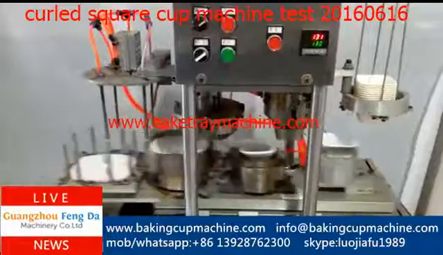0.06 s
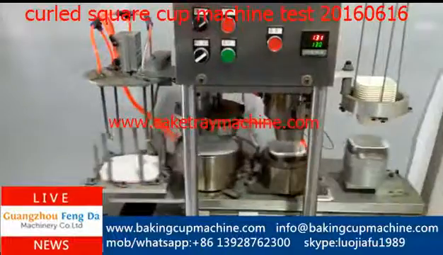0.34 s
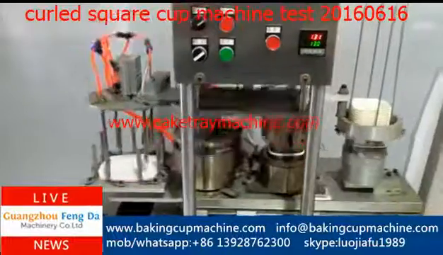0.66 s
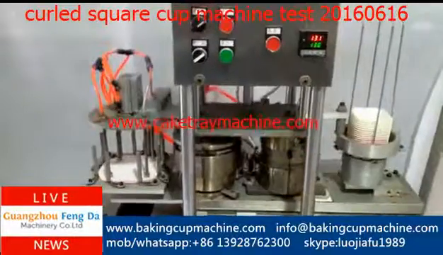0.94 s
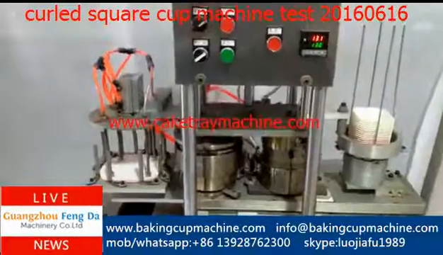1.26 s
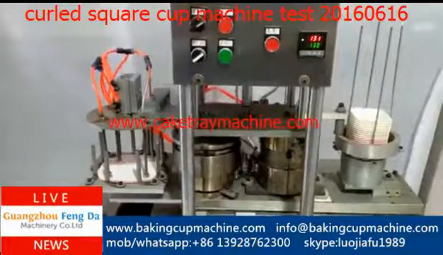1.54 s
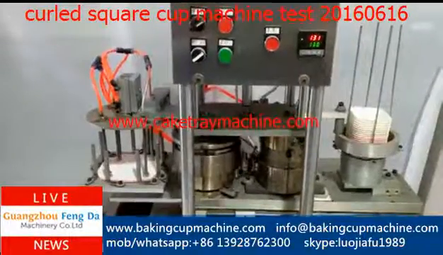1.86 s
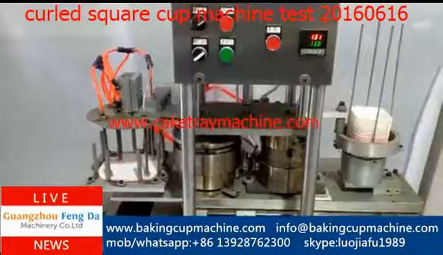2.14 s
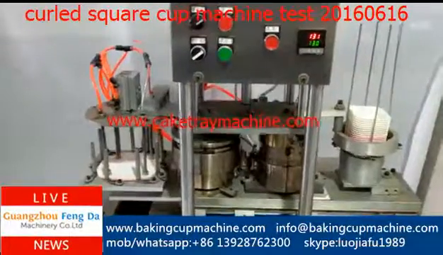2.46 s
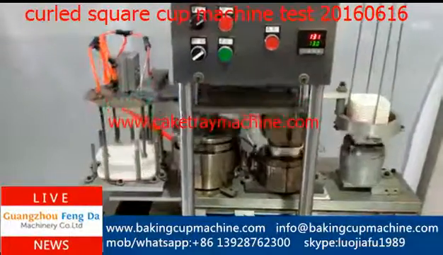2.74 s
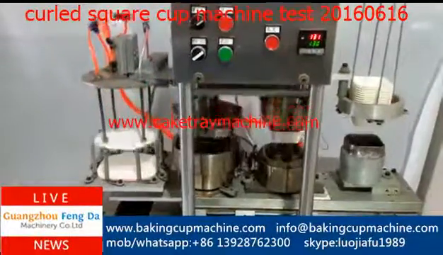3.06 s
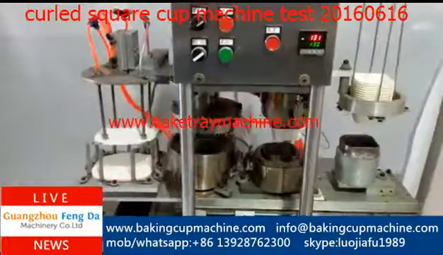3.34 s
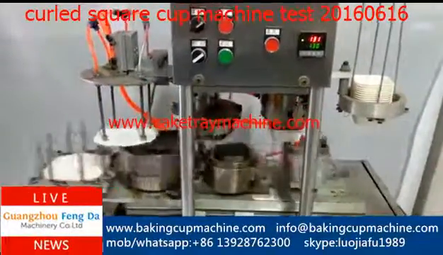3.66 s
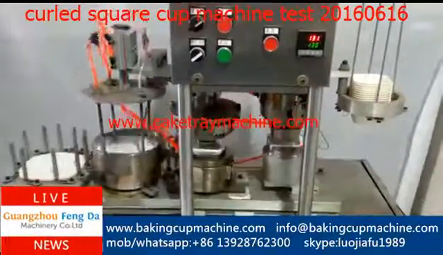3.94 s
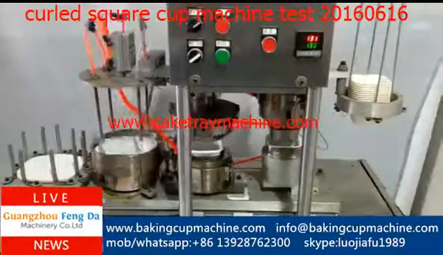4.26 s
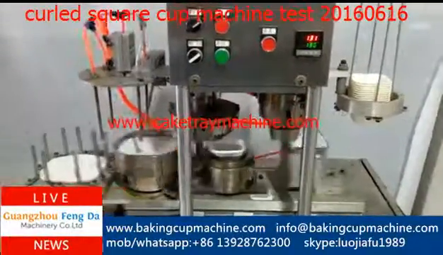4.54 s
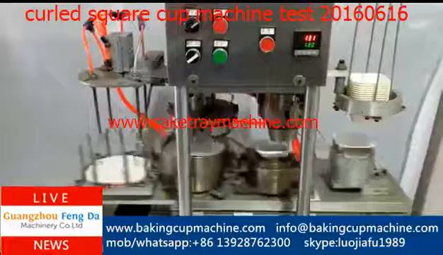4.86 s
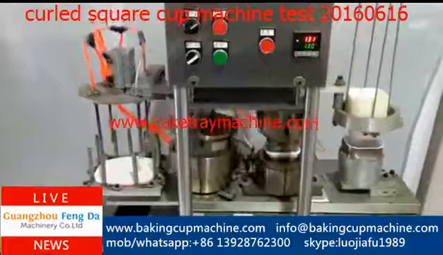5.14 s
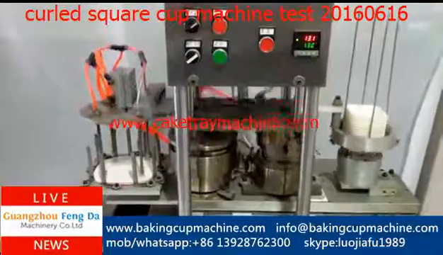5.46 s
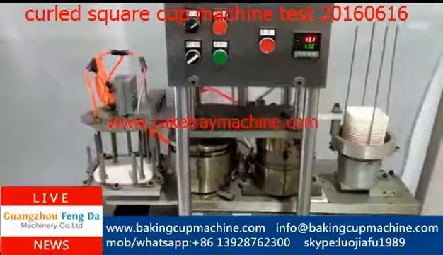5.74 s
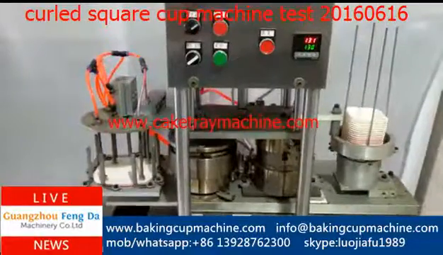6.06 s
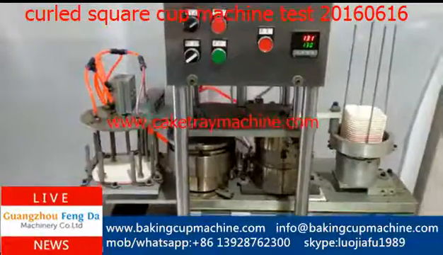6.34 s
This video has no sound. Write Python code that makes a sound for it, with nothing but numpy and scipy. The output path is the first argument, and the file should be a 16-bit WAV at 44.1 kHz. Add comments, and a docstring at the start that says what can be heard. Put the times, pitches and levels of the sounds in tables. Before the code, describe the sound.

Loud hisses of compressed air recur as a forming machine cycles, with thin leaks, metallic clatter and a motor humming between them.

```python
"""The air-driven press of a paper cup machine blows its air out through a silencer in three long blasts.
Between them air leaks, small feeder cylinders puff, the carriage clicks and scrapes, and pistons knock
on the steel frame. The press guides rub, and the frame creaks after each stroke. A motor and a vacuum
pump hum in the noisy workshop. One microphone hears it all; its automatic volume control turns the hum
down under each blast and lets it swell back."""
import sys
import numpy as np
from scipy import signal
from scipy.fft import rfft, irfft, next_fast_len
from scipy.io import wavfile
from scipy.ndimage import uniform_filter1d, minimum_filter1d

SR = 44100
rng = np.random.default_rng(int(sys.argv[2]) if len(sys.argv) > 2 else 0)


def generate_wav(sig):
    """Save sig (samples, or channels by samples) to the path in sys.argv[1] as 16-bit PCM at SR."""
    pcm = np.round(np.clip(np.atleast_2d(sig).T, -1, 1) * 32767).astype(np.int16)
    wavfile.write(sys.argv[1], SR, pcm)


N = 281799

# A "colour" says how strong low and high pitches are in a noise, compared with each other.
# workshop noise: (frequency [Hz], level [dB])
SHOP_COLOUR = [(25, -30), (50, -21), (75, -3), (130, 5.5), (260, 1.5), (400, 1), (550, 0.5), (750, -2),
               (1000, -4), (1450, -4), (2200, -9), (3500, -10.5), (6200, -9), (8000, -17), (14500, -33)]
# its rise and fall: (time [s], level [dB])
SHOP_SWELL = [(0, -32), (0.6, -33), (1.2, -31), (1.7, -33.5), (2.3, -25), (2.6, -32), (3.3, -32.5),
              (3.7, -31), (3.95, -29), (4.3, -28.5), (4.9, -32.5), (5.2, -35.5), (5.8, -31), (6.39, -32)]
# tones of motor and panels, pump, and loaded press: (frequency [Hz], level [dB], unsteadiness [0-1])
MOTOR_TONES = [(50.3, -59.5, 0.8), (99.7, -37, 0.06), (173.3, -50, 0.4), (199.5, -49, 0.3),
               (301, -48.5, 0.55), (318, -47.5, 0.4), (402.7, -47.5, 0.4), (604, -53, 0.7),
               (716, -48.5, 0.4)]
PUMP_TONES = [(150.4, -44, 0.4), (247.8, -38, 0.24), (270.6, -56, 0.6), (393, -50, 0.57), (493.4, -52, 0.5)]
LOAD_TONES = [(150.3, -39.5, 0), (734, -41.5, 0.3), (757, -51, 0.4), (770, -48, 0.4), (793, -47, 0.4)]
# how the motor and pump swell and sink: (time [s], level change [dB])
MOTOR_SWELL = [(0, -0.5), (1.3, -1.5), (2.25, 3.5), (3.2, 0), (4.7, 1), (5.5, -3), (6.39, 1)]
PUMP_SWELL = [(0, 0), (0.6, 1.5), (1.5, 1), (2.3, 7), (3.2, 1), (4.7, 1.5), (5.4, -4.5), (6.39, -6)]
# when the extra loaded tones sound: (start [s], end [s])
LOAD_TIMES = [(1.35, 3), (5.8, 6.39)]
# notes the steel frame rings at: (frequency [Hz], level [dB], time to fade by 60 dB [s])
FRAME_NOTES = [(376, -16, 0.054), (472, -9, 0.06), (623, 0.5, 0.09), (705, -4, 0.054), (810, 0, 0.086),
               (876, -3.5, 0.15), (1114, 0, 0.058), (1354, -3.5, 0.05), (1413, -3, 0.18), (1510, 1.5, 0.09),
               (1653, 2, 0.037), (1740, -3.5, 0.11), (1904, -4.5, 0.066), (2450, -3.5, 0.076)]
# pistons hit their stops and bounce: (time [s], level [dB], frequency that rings most [Hz])
PISTON_KNOCKS = [(0.744, -36, 1400), (2.756, -16, 1010), (2.782, -25, 800), (3.907, -22, 680),
                 (3.931, -21.5, 860), (3.948, -24.5, 450), (3.981, -31, 1400), (4.049, -21, 1140),
                 (4.063, -27.5, 1700), (4.107, -28.5, 1400), (4.337, -30, 1100), (4.353, -28, 720),
                 (5.372, -21, 900)]
# dull thud of a knock: (frequency [Hz], level [dB])
THUD_COLOUR = [(45, -20), (130, 9), (500, 0), (1000, 0), (2000, -2.5), (8000, -11.5)]
# pitches the steel fittings ring at: (frequency [Hz], width [Hz], boost [dB])
FITTING_PEAKS = [(3300, 500, 4), (4020, 670, 8.5), (4570, 500, 8), (5140, 620, 7.5), (6950, 580, 11),
                 (7800, 490, 12)]
# metal taps metal in the carriage and valves: (time [s], ring level [dB], snap level [dB])
METAL_CLICKS = [(3.589, -18.5, -35), (3.6337, -10.5, -21), (3.67, -13.5, -35), (3.7, -17.5, -35),
                (3.74, -29, -42), (3.907, -16, -22), (4.036, -26, -23), (4.172, -21, -22)]
# short strokes of the feeder cylinders: (time [s], level [dB], length [s])
FEEDER_PUFFS = [(3.909, -15, 0.01), (3.98, -25.5, 0.0055), (4.054, -17, 0.047), (4.27, -19, 0.0077),
                (4.354, -22, 0.017)]
# a puff of air: (frequency [Hz], level [dB])
PUFF_COLOUR = [(1000, -18), (2800, -4.5), (4000, 0), (5000, 7), (6300, 8.5), (8000, 2.5), (10000, -2),
               (12500, -6), (14500, -15)]
# air leaks before each press stroke, except while the feeder uses it: (start [s], end [s], level [dB])
LEAK_TIMES = [(-0.1, 0.29, -29.5), (2.06, 2.38, -45.5), (3.003, 3.89, -27.5), (4.16, 4.905, -29.5)]
# hiss of the leak: (frequency [Hz], level [dB])
LEAK_COLOUR = [(1000, -11.5), (2800, -1.5), (4000, 7.5), (5000, 6.5), (6100, 4), (6900, 8), (7800, 1.5),
               (9000, -3.5), (10000, 3), (11000, -10.5), (12300, 0), (13500, -3.5), (14500, -35)]
# its faint whistles: (frequency [Hz], width [Hz], boost [dB])
LEAK_PEAKS = [(4190, 330, 1.5), (5110, 470, 8.5), (5610, 72, 6), (5930, 96, 13.5), (6180, 90, 14),
              (6430, 49, 13), (6640, 80, 7), (6850, 80, 3.5)]
# hollow middle pitches of a blast: (frequency [Hz], width [Hz], level against the roar [dB])
HOLLOW_BANDS = [(329.4, 180, -25.5), (657, 48, -32.5), (1310, 68, -26.5), (1680, 98, -29),
                (1990, 75, -30.5)]
# roar of the air jet, and fine hiss of the silencer's pores: (frequency [Hz], level [dB])
ROAR_COLOUR = [(300, -75), (1000, -54), (2300, -17), (3000, -9), (3900, -4.5), (4700, -2), (6400, -1.5),
               (7200, -4.5), (8000, -6.5), (8800, -10.5), (11000, -13), (14500, -20.5)]
SIZZLE_COLOUR = [(2000, -52), (5000, -14), (8000, -12.5), (11000, -4.5), (14500, -6.5)]
# narrow, steady peaks in the blast's hiss: (frequency [Hz], width [Hz], boost [dB])
HISS_PEAKS = [(3060, 50, 3), (3220, 110, 3), (3470, 170, -4), (3790, 50, 2.5), (3990, 50, 3), (4255, 45, 3),
              (4380, 40, 3), (4500, 48, 5), (4640, 70, 2), (5024, 48, 4.5), (5137, 40, 3), (5260, 50, 3),
              (5510, 40, 2.5), (5617, 26, 5.5), (5682, 26, 6), (5985, 35, 4.5), (6074, 30, 7.5),
              (6130, 40, 4), (6268, 40, 7.5), (6388, 40, 9), (6599, 36, 7), (6655, 50, 3.5), (6820, 35, 3),
              (6903, 24, 5.5), (7030, 35, 3), (7120, 45, 4), (7560, 36, 6.5), (7630, 45, 3),
              (7790, 45, 3.5), (7985, 55, 5.5), (8330, 50, 3), (9900, 80, 4)]
# press strokes, down and up in turn: (time [s], blast level [dB], extra as the valve opens [dB],
# valve puff [dB], guide rub [dB], time until nearly empty [s], bright first spit [dB])
PRESS_STROKES = [(0.372, -4, 2, -12, -54, 1.017, -36), (2.383, -5.5, 6, -28, -21.5, 1.01, -17),
                 (5.005, -4.5, 4.5, -23, -57, 1.02, -36)]


def from_db(db):
    """Turns decibels into a number to multiply by."""
    return 10 ** (np.asarray(db) / 20)


def rms_one(x):
    """Scales a signal to an average strength (rms) of 1."""
    return x / np.sqrt(np.mean(x ** 2) + 1e-20)


def clock():
    """The time of every sample, in seconds."""
    return np.arange(N) / SR


def drift(rate):
    """A random wobble of size about 1, changing about rate times a second."""
    coarse = np.arange(0, N, SR // 1000)
    hz = np.fft.rfftfreq(len(coarse), coarse[1] / SR)
    spectrum = rfft(rng.standard_normal(len(coarse))) / (1 + (hz / rate) ** 2)
    return np.interp(np.arange(N), coarse, rms_one(irfft(spectrum, len(coarse))))


def noise(colour, peaks=()):
    """Noise of strength 1 with the given colour, boosted at each peak."""
    size = next_fast_len(N, True)
    hz = np.fft.rfftfreq(size, 1 / SR) + 1
    colour_hz, level_db = np.transpose(colour)
    shape_db = np.interp(np.log(hz), np.log(colour_hz), level_db)
    for centre, width, boost_db in peaks:
        shape_db += boost_db / (1 + (2 * (hz - centre) / width) ** 2)
    spectrum = rfft(rng.standard_normal(size)) * from_db(shape_db)
    return rms_one(irfft(spectrum, size)[:N])


def burst(start, rise, length, fade):
    """A loudness curve that rises, holds until start + length, then dies away (all in seconds)."""
    age = clock() - start
    return np.clip(age / rise, 0, 1) * np.exp(-np.maximum(age - length, 0) / fade)


def ring(force, hz, ring_s):
    """Each push starts a pure note that fades by 60 dB in ring_s."""
    decay, step = from_db(-60 / (ring_s * SR)), 2 * np.pi * hz / SR
    return signal.lfilter([0, np.sin(step)], [1, -2 * decay * np.cos(step), decay ** 2], force + 1e-18)


def drone(tones, waver_hz=4.4):
    """Long tones, each wavering a little in loudness and pitch."""
    times = np.arange(0, N / SR + 1, .5 / waver_hz)
    out = 0
    for hz, level_db, unsteady in tones:
        phase = 2 * np.pi * (hz * clock() + rng.random())
        swell, sway = (np.interp(clock(), times, row) for row in rng.standard_normal((2, len(times))))
        tone = (1 + unsteady * swell) * np.cos(phase) + unsteady * sway * np.sin(phase)
        out += from_db(level_db) * np.sqrt(2 / (1 + unsteady ** 2)) * tone
    return out


def workshop(flicker_db=1.1):
    """A wash of machine noise that flickers slightly."""
    level_db = np.interp(clock(), *np.transpose(SHOP_SWELL))
    return from_db(level_db + flicker_db * drift(22)) * noise(SHOP_COLOUR)


def hum():
    """Motor and pump hum all the time; more tones join for a while under load."""
    motor = from_db(np.interp(clock(), *np.transpose(MOTOR_SWELL))) * drone(MOTOR_TONES)
    pump = from_db(np.interp(clock(), *np.transpose(PUMP_SWELL))) * drone(PUMP_TONES)
    load = sum(burst(start, 0.35, end - start, 0.34) for start, end in LOAD_TIMES)
    return motor + pump + load * drone(LOAD_TONES)


def room(x, echo_db=-8.0, ring_s=0.085):
    """Adds many quick echoes from the machine and the nearby walls."""
    age = np.arange(SR // 2) / SR
    tail = rng.standard_normal(len(age)) * from_db(-60 * age / ring_s) * (age > .002)
    echoes = signal.fftconvolve(x, tail / np.sqrt(np.sum(tail ** 2)))[:N]
    return (x + from_db(echo_db) * echoes) / np.sqrt(1 + from_db(echo_db) ** 2)


def guides(creak_db=-21, creak_after_s=0.446, flicker_db=8.5):
    """The guides rub as the press moves, then the frame creaks; the middle pitches flicker unevenly."""
    rub = creak = out = 0
    for start, _, _, _, rub_db, _, _ in PRESS_STROKES:
        rub += from_db(rub_db) * burst(start, 0.14, 0.31, 0.031)
        creak += from_db(creak_db) * burst(start + creak_after_s, 0.026, 0.17, 0.031)
    for hz, level_db, ring_s in FRAME_NOTES:
        octaves_below = max(np.log2(1930 / hz), 0)  # low notes are shaken less
        force = rub * from_db(-23 * octaves_below) + creak * from_db(-30 * octaves_below)
        note = rms_one(ring(rng.standard_normal(N), hz, ring_s))
        out += force * from_db(level_db + flicker_db * np.tanh(drift(7.8))) * note
    return out / np.sqrt(len(FRAME_NOTES))


def knocks(uneven_db=3.0, thud_db=-6.0, spread_octaves=0.31, far_db=-9.5):
    """A piston thuds and makes the frame ring; where it lands decides which notes ring most."""
    times, knock_db, centre_hz = np.transpose(PISTON_KNOCKS)
    thuds = sum(from_db(db + thud_db) * burst(start, 0.0011, 0.0027, 0.031)
                for start, db, _ in PISTON_KNOCKS)
    out = thuds * noise(THUD_COLOUR)
    for hz, note_db, ring_s in FRAME_NOTES:
        far = 1 - np.exp(-(np.log2(hz / centre_hz) / spread_octaves) ** 2)  # 0 at the knock's pitch
        hit_db = knock_db + note_db + far_db * far + uneven_db * rng.standard_normal(len(times))
        force = np.zeros(N)
        force[(times * SR).astype(int)] = from_db(hit_db) * rng.choice([-1, 1], len(times))
        out += ring(force, hz, ring_s)
    return out


def carriage(level_db=-24.5, rough_db=2.0):
    """From the first click on, the carriage scrapes along its rail and shakes the steel fittings."""
    start = min(time for time, _, _ in METAL_CLICKS)
    scrape = from_db(level_db + rough_db * drift(90)) * burst(start, 0.043, 0.15, 0.1)
    return scrape * noise([(1000, -0.5), (5000, 1), (14000, -15)], FITTING_PEAKS)


def clicks():
    """Metal meets metal with a bright snap and a brief ring of the fittings."""
    rings = sum(from_db(db) * burst(start, 0.00066, 0.00088, 0.0061) for start, db, _ in METAL_CLICKS)
    snaps = sum(from_db(db) * burst(start, 0.00061, 0.0023, 0.0071) for start, _, db in METAL_CLICKS)
    rings *= noise([(1000, -11), (5000, 23), (14000, -21)], FITTING_PEAKS)
    snaps *= noise([(1000, -33), (6000, 22), (14000, 6)])
    return rings + snaps


def puffs(valve_s=0.0082):
    """Each feeder stroke, and each switch of the press valve, lets out a puff of air."""
    valve_puffs = [(start, puff_db, valve_s) for start, _, _, puff_db, *_ in PRESS_STROKES]
    flow = sum(from_db(db) * burst(start, 0.013, length, 0.031)
               for start, db, length in FEEDER_PUFFS + valve_puffs)
    return flow * noise(PUFF_COLOUR)


def leak(seep_db=-44, flutter_db=0.56):
    """Leaking air makes a thin, whistly hiss that builds, holds and dies back to a faint seep."""
    flow = sum(from_db(db) * burst(start, 0.23, end - start, 0.093) for start, end, db in LEAK_TIMES)
    return (from_db(seep_db) + flow) * from_db(flutter_db * drift(37)) * noise(LEAK_COLOUR, LEAK_PEAKS)


def warble(dip_db=19.0, wander_hz=54.9):
    """The hollow part of a blast: narrow bands of noise each wander in pitch, dip and come back."""
    out = 0
    for hz, width, level_db in HOLLOW_BANDS:
        phase = 2 * np.pi * np.cumsum(hz + wander_hz * drift(7)) / SR
        band = drift(width / 2) * np.cos(phase) + drift(width / 2) * np.sin(phase)
        out += from_db(level_db + dip_db * np.minimum(drift(11), 0)) * band
    return out


def press_blasts(flutter_db=0.66, open_s=0.02, extra_fade_s=0.13, spit_fade_s=0.17):
    """Air roars out, fading ever faster as the cylinder empties; the silencer's pores spit, then hiss."""
    roar = sizzle = 0
    for start, level_db, extra_db, _, _, empty_s, spit_db in PRESS_STROKES:
        age = np.maximum(clock() - start, 0)
        valve = np.minimum(age / open_s, 1)
        pressure_db = level_db + extra_db * np.exp(-age / extra_fade_s)
        roar_drop_db = np.minimum(30 * (age / empty_s) ** 3.06, 100)
        roar += valve * from_db(pressure_db - roar_drop_db)
        # the fine hiss lasts a little longer and depends less on the pressure
        sizzle_drop_db = np.minimum(45 * (age / (1.19 * empty_s)) ** 5.4, 100)
        sizzle += valve * from_db(-17 + 0.36 * pressure_db - sizzle_drop_db)
        sizzle += valve * from_db(spit_db) * np.exp(-age / spit_fade_s)
    flutter = from_db(flutter_db * drift(57))
    jet = noise(ROAR_COLOUR, HISS_PEAKS) + warble()
    return flutter * (roar * jet + sizzle * noise(SIZZLE_COLOUR))


def scene():
    """Mixes everything into two equal channels; only the air sounds and the guides get echoes."""
    echoing = room(press_blasts() + leak() + puffs() + guides())
    machine = echoing + knocks() + clicks() + carriage()
    return np.tile(machine + hum() + workshop(), (2, 1))


def loudness_db(x, seconds):
    """The level, averaged over a short time."""
    return 10 * np.log10(np.maximum(uniform_filter1d(x[0] ** 2, int(seconds * SR)), 1e-10))


def fall_slowly(level_db, db_per_s):
    """Follows a rise at once, but falls no faster than db_per_s."""
    ramp = db_per_s * clock()
    return np.maximum.accumulate(level_db + ramp) - ramp


def volume_control(x, target_db=-10.0, max_boost_db=13.0, hold_s=0.64, ahead_s=0.0032):
    """Turns quiet stretches up, but waits a while after the last loud sound."""
    level_db = loudness_db(x, 0.0093)
    level_db[0] = -17.5  # start with only part of the boost
    size = int(hold_s * SR) | 1
    recent_peak_db = -minimum_filter1d(-level_db, size, origin=size // 2, mode="nearest")
    boost_db = np.clip(target_db - fall_slowly(recent_peak_db, db_per_s=14), 0, max_boost_db)
    boost_db = np.interp(clock() + ahead_s, clock(), boost_db)
    return x * from_db(uniform_filter1d(boost_db, int(.035 * SR)))


def limiter(x, limit_db=-14.0, strength=0.79, react_s=0.0094, ceiling=1.33):
    """Turns loud blasts down, a little late so their first spit gets through, and rounds their peaks."""
    level_db = fall_slowly(loudness_db(x, 0.038), db_per_s=65)
    over_db = np.maximum(level_db - limit_db, 0)
    lag = np.exp(-1 / (react_s * SR))
    cut_db = strength * signal.lfilter([1 - lag], [1, -lag], over_db)
    return ceiling * np.tanh(x * from_db(-cut_db) / ceiling)


def record(dry):
    """Volume control, limiter, then a steep cut of everything above 14750 Hz."""
    treble_cut = signal.ellip(10, .05, 60, 14750, fs=SR, output="sos")
    return signal.sosfiltfilt(treble_cut, limiter(volume_control(dry)))


dry = scene()
out = record(dry)
generate_wav(out)
```